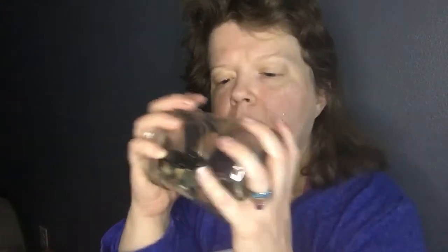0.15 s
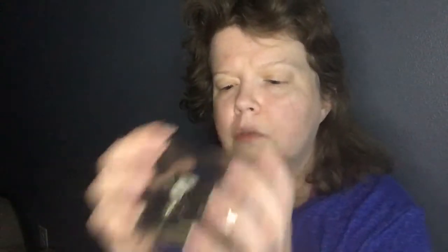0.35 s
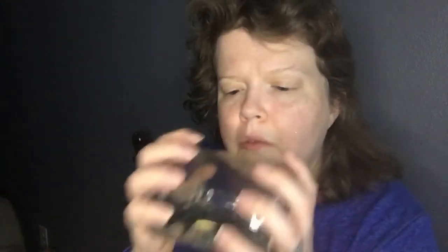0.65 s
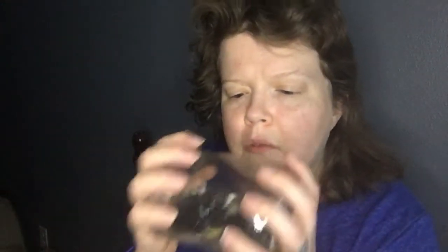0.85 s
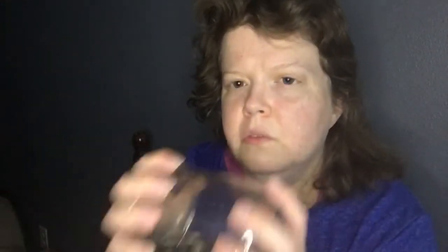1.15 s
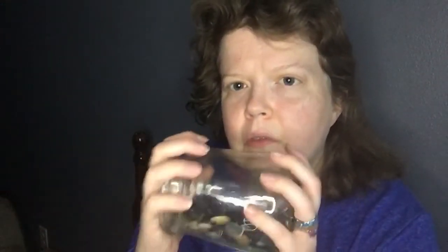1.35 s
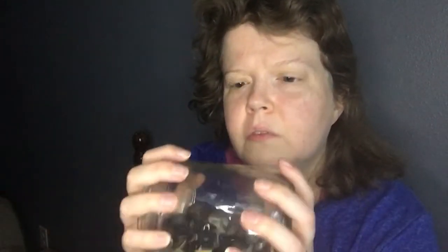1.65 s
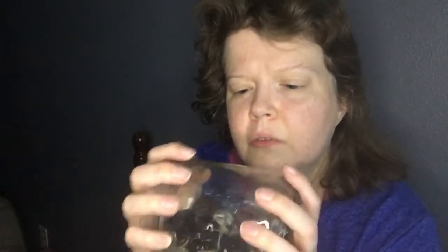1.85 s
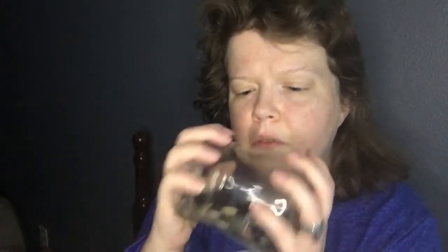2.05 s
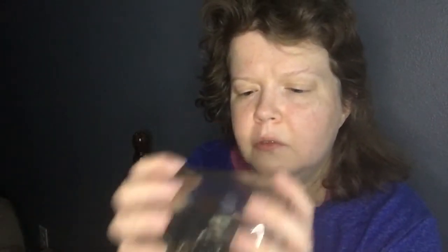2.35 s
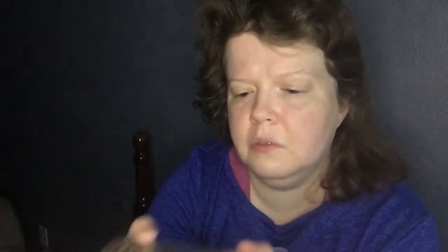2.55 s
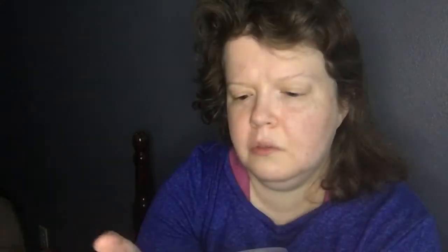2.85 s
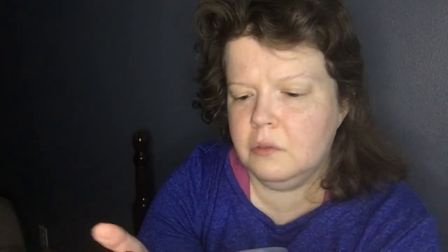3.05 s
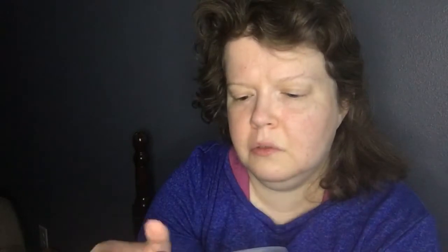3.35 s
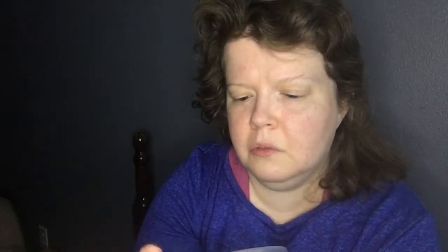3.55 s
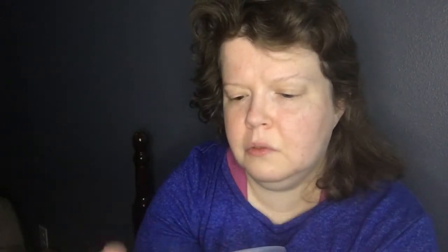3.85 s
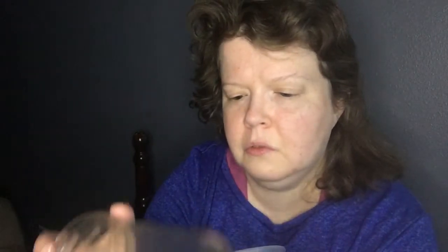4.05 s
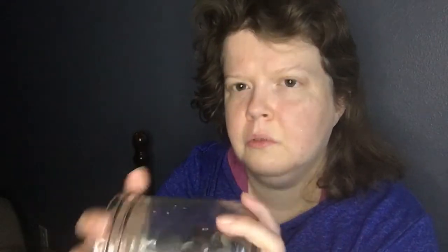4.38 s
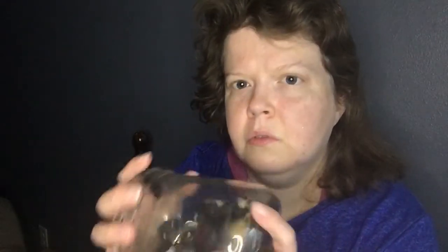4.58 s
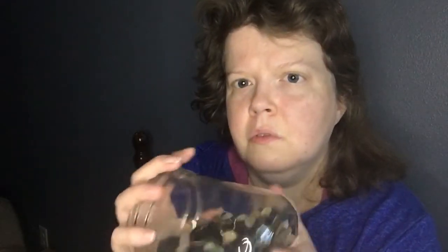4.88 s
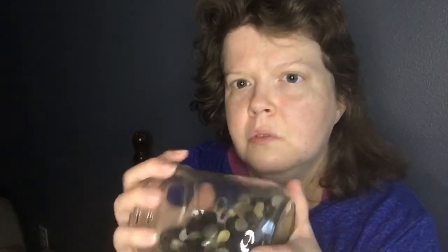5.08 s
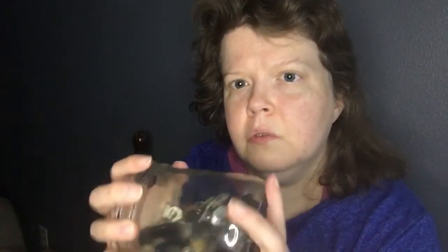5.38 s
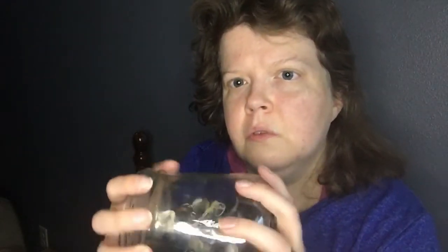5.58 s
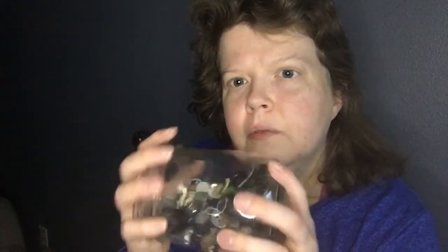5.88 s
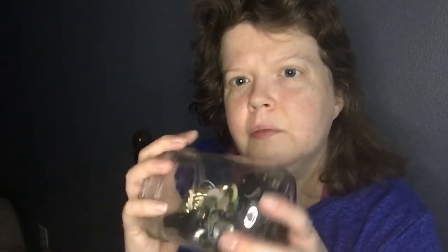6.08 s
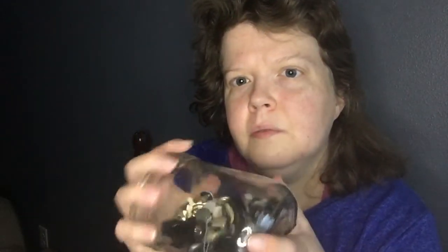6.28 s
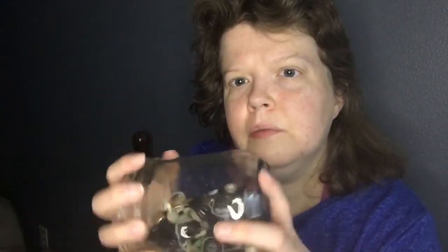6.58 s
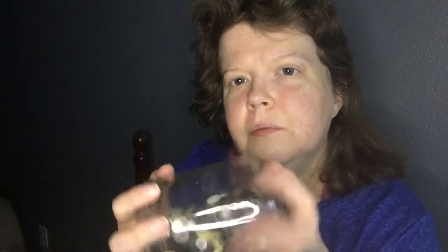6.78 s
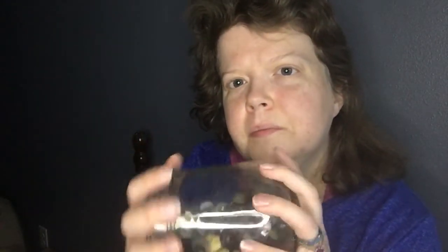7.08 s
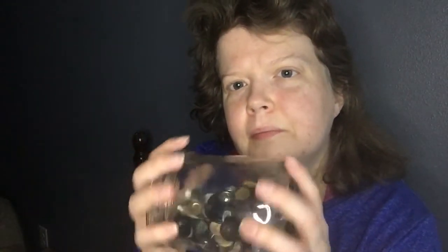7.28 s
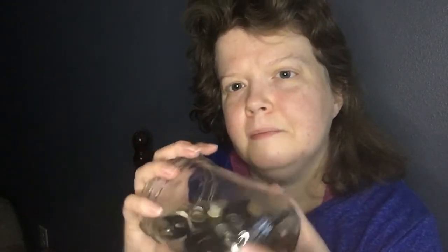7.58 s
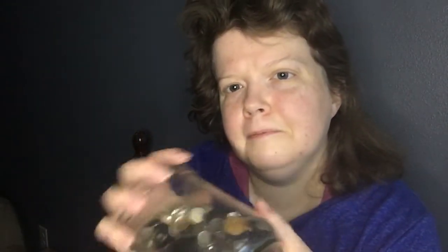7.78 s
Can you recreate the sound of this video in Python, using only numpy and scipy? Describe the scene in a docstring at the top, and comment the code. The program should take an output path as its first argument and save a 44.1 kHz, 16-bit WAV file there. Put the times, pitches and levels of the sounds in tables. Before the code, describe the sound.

Loose buttons rustle and clink in a glass jar that is tilted and shaken close to the microphone. From about 0.3 to 1.4 seconds the heap tumbles in quick surges, with sharp clinks that ring only briefly. Lighter taps follow, then another slide around 2.5 seconds. At about 3.2 seconds comes a bright ping with soft hollow knocks, and a short rattle at 3.6 gives way to a brief lull. A strong tumble arrives between 4.5 and 4.9 seconds, and another with a knock near 5.4. From 6 seconds the buttons patter and clink almost continuously, with a hollow bump near 6.8 and firm clinks around 7.5, still moving at about 8 seconds. The jar gives a faint hollow note as the heap slides. The small room adds a slight echo over a faint low hum and soft hiss.

```python
"""Loose buttons rustle and clink in a glass jar, tilted and shaken close by.
Single buttons strike the hand-damped wall: a crack and a short ring of glass modes.
In between the heap slides and tumbles, a patter of small contacts that keeps the jar's
hollow note humming. Now and then a bump gives a hollow knock.
A small room answers, over a low mains hum and soft hiss."""
import sys
import numpy as np
from scipy import signal
from scipy.fft import rfft, irfft, next_fast_len
from scipy.io import wavfile
from scipy.ndimage import uniform_filter1d

SR = 44100
rng = np.random.default_rng(int(sys.argv[2]) if len(sys.argv) > 2 else 0)


def transcribe(signal):
    """Save signal, clipped to [-1, 1], as a 16-bit WAV file at the path in sys.argv[1]."""
    frames = np.atleast_2d(signal).T
    limited = np.clip(frames, -1, 1)
    pcm = np.round(limited * 32767).astype(np.int16)
    wavfile.write(sys.argv[1], SR, pcm)


N = 349713
RING_SAMPLES = 4096
TIME_S = np.arange(N) / SR
AGE_S = np.arange(RING_SAMPLES) / SR

# still room air: f/Hz, level/dB
AIR_SPECTRUM = [(20, -29), (35, -20), (50, -3), (80, -1), (150, -5.5), (300, -10), (550, -12),
                (1000, -15.5), (2000, -16.5), (6000, -22.5), (10000, -32.5), (16000, -41.5)]
# wavering mains hum: t/s, level/dB
MAINS_LEVEL = [(0.0, -58), (0.22, -56.5), (0.86, -63), (3.49, -60), (3.84, -66.5), (4.24, -58), (4.84, -68),
               (4.95, -58.5), (5.72, -66), (5.92, -54.5), (6.89, -65), (7.22, -57.5), (7.73, -70),
               (7.93, -57)]
# slow part of the room's tail: f/Hz, level/dB
TAIL_SPECTRUM = [(5000, -3.5), (8000, -6.0), (14000, -6)]
# jar's hollow note, set by the grip: t/s, f/Hz, level re heap/dB
HOLLOW_NOTE = [(0, 450, -21.5), (0.4, 453.2, -34), (2.9, 466, -32.5), (3.15, 542, -19.5),
               (4.25, 537.3, -18), (4.5, 491.6, -40), (5.2, 493, -32), (6.3, 464.4, -30),
               (7.93, 489.3, -30)]
# bumps of the jar: t/s, level over 10 ms/dB, ring f/Hz, thud re ring/dB
BUMPS = [(0.313, -39.5, 450, 29), (3.2465, -41.5, 538, -9.5), (3.271, -46, 530, 7),
         (3.298, -47.5, 539.6, 0.5), (3.608, -44.5, 558, 3.5), (4.263, -46, 524, 11.5),
         (5.33, -38, 518, 19), (6.826, -33, 490, 13), (6.832, -35.5, 489, 13)]
# thud of a bump: f/Hz, level/dB
THUD_SPECTRUM = [(80, -28), (250, -23.5), (500, 0.5), (750, -4.5), (1300, 3), (2500, -0.5), (6000, -6.5)]
# crack of a contact: f/Hz, level/dB
CRACK_SPECTRUM = [(100, -33.5), (400, -16), (900, -7.5), (1400, -1), (2200, 2), (3000, 2), (5000, 4.5),
                  (7500, 2.5), (8700, -2.5), (14000, -9.5), (15600, -2), (16500, -23)]
# glass wall modes: f/Hz, t60/s, relative energy/dB
GLASS_MODES = [(1832.4, 0.023, -2), (2290, 0.0023, -12.5), (2990, 0.019, -18.5), (4623.3, 0.021, 0),
               (5036, 0.039, -25.5), (5980, 0.0083, -18.5), (6887, .012, -12.5), (7237, 0.018, -4),
               (7506.6, 0.02092, -5.5), (7887, 0.027, -12.5), (10090, 0.022, -10.5), (10770, 0.032, -18.5),
               (13200, 0.014, -17.5), (12320, .018, -17.5), (13550, 0.0056, -10), (15000, 0.03, -19),
               (15400, 0.026, -21.5)]
# jar's second mode set: f/Hz, t60/s, relative energy/dB
SECOND_MODES = [(1777, .015, -22.5), (3075, 0.024, -13.5), (5240, 0.025, -8), (5347, .032, 5.5),
                (5900, 0.032, -17.5), (7900, 0.017, -18.5), (9550, 0.022, -3), (11880, 0.023, -15)]
# one slide per tip of the jar: landing t/s, level/dB, 60 dB rise/s, 60 dB fall/s, brightness/dB
HEAP_SLIDES = [(0.014, -63, .5, .25, -9), (0.219, -47, .35, 1.1, -5), (0.321, -38.5, .12, .3, 11),
               (0.435, -25, .16, .25, 2.5), (0.638, -36, .2, .34, -10), (0.736, -28, .21, .26, 0.5),
               (0.998, -24, .12, .2, 2), (1.118, -43.5, .7, .7, -21), (1.221, -45.5, .3, .7, -7),
               (1.386, -41, .5, .35, -5), (2.114, -50, .35, .18, -17), (2.391, -51, .28, .55, -11),
               (2.515, -35.5, .3, .4, -8), (2.882, -65, .3, .35, 3), (3.276, -38.5, .4, .25, 1),
               (3.399, -52.5, .3, .3, -2), (3.604, -38, .38, .47, -1.5), (4.225, -57.5, .4, 1.5, -2),
               (4.499, -39, .4, .37, -2), (4.642, -29, .25, .5, 3.5), (4.818, -36, .67, .4, -1),
               (5.165, -55, .4, 1.3, -3), (5.336, -42, .53, .5, -2), (5.431, -39, .45, .2, 1),
               (5.695, -49, .2, .7, -8), (5.965, -49.5, 1.05, .9, -8), (6.157, -46, .3, 1.1, 0),
               (6.447, -50.5, .6, .9, -7), (6.562, -44, .28, .22, 2), (6.661, -42, .16, .42, -2),
               (6.841, -39, .13, .28, 5), (6.938, -33.5, .08, .29, 8), (7.17, -50, .7, .76, -5),
               (7.373, -40.5, .17, .3, 3), (7.504, -37.5, .24, .3, -3), (7.858, -49, .3, 1.0, -4),
               (7.919, -36, .18, .42, 1)]
# light taps of the heap: f/Hz, level/dB
TAP_SPECTRUM = [(900, -3), (1300, -2), (1600, 3), (1850, 2.5), (2400, -1), (3100, 2.5), (4600, .5),
                (6200, -1), (7300, 1), (10000, .5), (14000, 0)]
# strikes on the second mode set: t/s, level over 10 ms/dB, treble/dB
PING_HITS = [(0.3445, -40, -6), (1.6463, -61.5, 8), (1.695, -62, 14.5), (3.2462, -19.3, -5),
             (3.3848, -44.5, 0), (3.675, -45, 4), (4.239, -47, -6), (4.2804, -50, -9), (5.274, -40.5, -4.5),
             (6.1565, -34, -16), (6.1867, -37, -18.5), (6.202, -38.5, -2.5), (6.229, -47, -3),
             (6.3751, -48, -6), (6.8289, -28.5, 10)]
# clink colour as the jar turns: t/s, gain below 1 kHz/dB, gain at 6.8-8 kHz/dB
TURN_COLOUR = [(0, 2, 1.5), (2.1, 1, -2), (2.8, 0, 6), (4.6, -1, 7), (5.4, -1, 4), (7.4, -7, 8)]
# clear wall strikes: t/s, level over 10 ms/dB, lowest mode gain/dB, hardness (more = brighter)
CLINK_HITS = [(0.0538, -50, 6.5, -37), (0.149, -55, 1, 4), (0.314, -25.5, -3, 1), (0.398, -27.5, 4, -19),
              (0.4176, -27.5, -3, -1), (0.424, -24.5, 5, 0), (0.4364, -26.5, -6, -3), (0.4555, -27, -10, 2),
              (0.4934, -40, -13, 14), (0.5924, -39, 12, -35.5), (0.6074, -33.5, 12, 0.5),
              (0.621, -26, 1.5, -12), (0.6454, -29.5, 6.5, 7), (0.6775, -31.5, 7, 6.5), (0.7095, -29, 0, 3),
              (0.7228, -16, -5, -9), (0.7289, -26, 1, 4), (0.737, -34, -8, 3), (0.7601, -29.5, -16, -32),
              (0.7845, -26.5, -1, 1.5), (0.935, -34.5, -3, 1.5), (0.961, -34.5, -1, -7),
              (0.9846, -17, 1.5, -6.5), (0.9999, -25.5, -10, 2), (1.0064, -29.5, 7, -3),
              (1.112, -31, 5, -24), (1.196, -41, 5, -3), (1.2774, -14.5, -5, -4.5), (1.307, -34, -13, 12.5),
              (1.358, -25, -3, -25), (1.3832, -33.5, -4, -25), (1.4863, -46.5, 5, 17), (1.9142, -34, 3, 3),
              (2.0096, -42.5, -2.5, -28.5), (2.03, -51, 7, -2), (2.078, -42.5, -5.5, -20),
              (2.109, -39, -0.5, -16.5), (2.144, -51, -3, -7), (2.2606, -56, -13, 0),
              (2.2834, -58.5, 4, 10), (2.332, -50.5, -2, -2), (2.3683, -44, 4, -1), (2.389, -48, -3, -9),
              (2.411, -47, -6, -8), (2.4593, -35.5, 1, 8), (2.481, -24, 5.5, -3), (2.5017, -31, -2, -10),
              (2.5123, -28, -24, -9), (2.5718, -34, -2, -7.5), (2.5922, -40, -1, -2), (2.7388, -56, -2, 8),
              (2.8012, -49.5, -1, 1), (2.8152, -46.5, 0, 0), (2.8355, -58, 1, -2), (2.886, -43.5, -6, 9),
              (2.9068, -56, -3, 5), (2.9758, -54.5, -3.5, 5), (3.1194, -55.5, 3.5, -3.5),
              (3.2394, -37.5, -9, -18), (3.545, -40.5, 4.5, -4), (3.5833, -27, -7.5, -1),
              (3.608, -27.5, -12.5, -6.5), (3.9092, -57, -3, -10), (4.1937, -49, -11.5, -3),
              (4.3603, -46, -2, -1.5), (4.4764, -38.5, 3, 0), (4.4993, -37, -2, -4), (4.5152, -35, 2.5, 11),
              (4.5897, -25, 8, 14.5), (4.6443, -21.3, 13, 6), (4.6765, -18.2, 13, -2),
              (4.7149, -30, 7, -17), (4.756, -35.5, 2, 3), (4.7742, -34, 10.5, 6.5),
              (4.7876, -35.5, 14, 10), (5.0943, -54, 7, 7), (5.3305, -25.5, -6.5, -8),
              (5.3491, -33, -11, 1), (5.414, -34, 0.5, -1), (5.5316, -49, -2, -1),
              (5.4416, -23.5, -9.5, -1), (5.5674, -35.5, -2.5, -8.5), (5.5937, -41.5, -6, -6),
              (5.8125, -39, -3, 5), (5.8293, -47, 8, 5), (5.8497, -44, -5, -3), (5.887, -40, 8, 11.5),
              (6.0699, -30, -1.5, 0), (6.1196, -40, 2, -1), (6.1404, -45, -6, -16),
              (6.423, -47, -19.5, -9.5), (6.4531, -30.5, -2.5, 4), (6.538, -31.5, -6, 0),
              (6.5574, -38.5, -4, 0), (6.6269, -33, -5, 3), (6.6562, -37.5, 5, 4), (6.6888, -41, 5, -11),
              (6.754, -37, 5, -2.5), (6.853, -35.5, -4, -3), (6.8748, -34.5, -2.5, 0),
              (6.8826, -31, 2.5, 8), (6.919, -28, -11, 11.5), (6.935, -34.5, -3, 7),
              (6.9865, -39.5, -5, -3.5), (7.0512, -48, 3, 8), (7.1123, -41, -6, -4), (7.1294, -43.5, -1, 0),
              (7.1683, -43.5, -21, 8), (7.181, -40, -17, -13), (7.3235, -36.5, -4, 0),
              (7.354, -33, -6.5, -2), (7.3736, -38, -5, -1), (7.3885, -20.3, -3, -15),
              (7.4627, -24.3, 2.5, -11.5), (7.5116, -18.2, 3, -6), (7.5304, -34, -15, -21),
              (7.5477, -29, 2, -13), (7.7265, -52.5, -3, 0), (7.902, -40, -12, -6), (7.912, -38.5, -10, -4)]


def undb(db):
    """Decibels to gain."""
    return 10 ** (np.asarray(db) / 20)


def unit(x):
    """Scale to energy 1."""
    return x / np.sqrt(np.sum(x ** 2))


def fade(t_s, t60_s):
    """Exponential decay."""
    return np.exp(-np.log(1000) * t_s / t60_s)


def curves(table, at_s=TIME_S):
    """Columns of a time table, interpolated."""
    t_s, *columns = np.transpose(table)
    return [np.interp(at_s, t_s, column) for column in columns]


def colour(x, spectrum):
    """Minimum-phase filter through points f/Hz, level/dB."""
    n = next_fast_len(len(x), real=True)
    f_hz, db = np.transpose(spectrum)
    bins_hz = np.maximum(np.arange(n // 2 + 1) * SR / n, 1)
    gain = undb(np.interp(np.log(bins_hz), np.log(f_hz), db))
    cepstrum = irfft(np.log(gain), n)
    cepstrum[1:n // 2] *= 2
    cepstrum[n // 2 + 1:] = 0
    return irfft(rfft(x, n) * np.exp(rfft(cepstrum)), n)[:len(x)]


def drift(rate_hz):
    """Smooth random drift, spread near 1."""
    hold = int(SR / rate_hz)
    steps = np.repeat(rng.standard_normal(N // hold + 1), hold)
    return uniform_filter1d(steps, hold)[:N]


def place(track, t_s, sound, level_db):
    """Add a sound with the energy of 10 ms at level_db."""
    i = int(t_s * SR)
    track[i:i + RING_SAMPLES] += (unit(sound) * undb(level_db) * np.sqrt(SR / 100))[:N - i]


def room_air():
    """Soft hiss of the room."""
    hiss = np.sqrt(N) * unit(colour(rng.standard_normal(N), AIR_SPECTRUM))
    return hiss * undb(-68.5 + 0.8 * drift(1.5))


def hum(f_hz, level_db, waver_hz):
    """Low tone, wavering in pitch and level."""
    phase = 2 * np.pi * np.cumsum(f_hz + waver_hz * drift(9)) / SR
    return np.sqrt(2) * undb(level_db + 0.4 * drift(2.7)) * np.sin(phase)


def hums():
    """Mains hum and two fainter tones; one fades out."""
    mains_db, = curves(MAINS_LEVEL)
    fading_db = -65 - 20 * np.maximum(TIME_S - 2.374, 0)
    return hum(58.4, mains_db, 2.2) + hum(105.3, fading_db, 1.3) + hum(118.3, -73.5, 1.8)


def room(x, early_db, early_t60_s, late_db, late_t60_s):
    """Quick reflections off table and body, then a tail that dulls as it fades."""
    t_s = np.arange(SR * 3 // 4) / SR
    onset = np.clip((t_s - 0.003) / 0.0013, 0, 1)
    early, bright, dark = rng.standard_normal((3, len(t_s))) * onset
    tail = colour(dark * fade(t_s, late_t60_s), TAIL_SPECTRUM)
    tail += 0.78 * bright * fade(t_s, 0.4 * late_t60_s)
    response = undb(early_db) * unit(early * fade(t_s, early_t60_s)) + undb(late_db) * unit(tail)
    return signal.oaconvolve(x, response)[:N]


def hollow_note(heap_db):
    """The moving heap drives the jar's hollow resonance."""
    f_hz, share_db = curves(HOLLOW_NOTE)
    drive = rng.standard_normal(N) * undb(heap_db + share_db)
    amplitude = signal.oaconvolve(drive, unit(fade(AGE_S, t60_s=0.17)))[:N]
    return np.sqrt(2) * amplitude * np.sin(2 * np.pi * np.cumsum(f_hz) / SR)


def knocks():
    """Bumps on the jar: short thud, hollow ring."""
    out = np.zeros(N)
    attack = 1 - np.exp(-AGE_S / 0.001)
    for t_s, level_db, f_hz, thud_db in BUMPS:
        ring = np.sin(2 * np.pi * f_hz * AGE_S) * fade(AGE_S, t60_s=0.088) * attack
        thud = colour(rng.standard_normal(RING_SAMPLES) * fade(AGE_S, t60_s=0.039), THUD_SPECTRUM)
        place(out, t_s, unit(ring) + undb(thud_db) * unit(thud), level_db)
    return out


def strike(modes, crack_db, crack_t60_s, scatter_db, detune, button_db):
    """One contact: crack, the button's own tick, glass modes varying with spot and grip."""
    f_hz, t60_s, mode_db = np.transpose(modes)[:, :, None]
    spot, shift, grip = rng.standard_normal((3, len(modes), 1))
    f_hz = f_hz * (1 + detune * shift)
    t60_s = t60_s * np.exp(0.19 * grip)
    rings = np.sin(2 * np.pi * f_hz * AGE_S) * fade(AGE_S, t60_s) / np.sqrt(t60_s)
    polarity = (-1) ** np.arange(len(modes))[:, None]  # neighbouring modes in antiphase
    attack = 1 - np.exp(-AGE_S / 0.0001)  # bending wave runs round the jar
    glass = attack * np.sum(polarity * undb(mode_db + scatter_db * spot) * rings, axis=0)
    crack = colour(rng.standard_normal(RING_SAMPLES) * fade(AGE_S, crack_t60_s), CRACK_SPECTRUM)
    button_hz = rng.uniform(4500, 13000)
    button = attack * np.sin(2 * np.pi * button_hz * AGE_S) * fade(AGE_S, t60_s=0.0038)
    return unit(unit(glass) + undb(crack_db) * unit(crack) + undb(button_db) * unit(button))


def heap_motion(rest_db, rest_bright_db):
    """Slides build, land and settle over a faint stir: level/dB, power-weighted brightness/dB."""
    power = np.full(N, undb(rest_db) ** 2)
    bright_sum = power * rest_bright_db
    for t_s, level_db, rise_s, fall_s, bright_db in HEAP_SLIDES:
        drop_db = 60 * np.maximum((t_s - TIME_S) / rise_s, (TIME_S - t_s) / fall_s).clip(0, 2)
        slide_power = undb(level_db - drop_db) ** 2
        power += slide_power
        bright_sum += slide_power * bright_db
    return 10 * np.log10(power), bright_sum / power


def patter(rate_hz, voices, spread_db):
    """Random small contacts, many faint, few firm; mean power near 1."""
    chance, force, pick = rng.random((3, N))
    gain = undb(spread_db * np.minimum(-np.log(1 - force), 3))
    gain /= np.sqrt(np.mean(gain ** 2))
    out = np.zeros(N + RING_SAMPLES)
    for i in np.flatnonzero(chance < rate_hz / SR):
        out[i:i + RING_SAMPLES] += gain[i] * voices[int(pick[i] * len(voices))]
    return out[:N] * np.sqrt(SR / rate_hz)


def tilt_treble(x, bright_db):
    """Tilt the treble, the top band most; level roughly held."""
    dull, below_top = (signal.sosfiltfilt(signal.butter(2, f_hz, fs=SR, output="sos"), x)
                       for f_hz in (6200, 11000))
    gain = undb(bright_db)
    tilted = dull + gain * (below_top - dull) + undb(1.2 * bright_db - 2.5) * (x - below_top)
    return tilted / np.sqrt((1 + gain ** 2) / 2)


def tumble(heap_db, bright_db):
    """Sliding buttons tap the glass and tick on each other, more often as the heap speeds up."""
    rate_hz = 600 * undb(0.3 * (heap_db + 46))
    tap_voices = [strike(GLASS_MODES, crack_db=-4, crack_t60_s=0.012, scatter_db=8.5,
                         detune=0.01, button_db=-17) for _ in range(40)]
    taps = patter(rate_hz, tap_voices, spread_db=5.7)
    tick_voices = [strike(SECOND_MODES, crack_db=3, crack_t60_s=0.007, scatter_db=4,
                          detune=0.008, button_db=0) for _ in range(24)]
    ticks = patter(0.4 * rate_hz, tick_voices, spread_db=4.8)
    heap = undb(-1.56) * colour(taps, TAP_SPECTRUM) + undb(-10.5) * ticks
    return tilt_treble(heap, bright_db) * undb(heap_db)


def pings():
    """Strikes that wake the jar's second mode set."""
    out = np.zeros(N)
    for t_s, level_db, treble_db in PING_HITS:
        hit = strike(SECOND_MODES, crack_db=-9, crack_t60_s=0.015, scatter_db=2.5,
                     detune=0.0056, button_db=-17.5)
        place(out, t_s, colour(hit, [(6000, 0), (9500, treble_db)]), level_db)
    return out


def clinks():
    """Single buttons hit the wall; the spot weights the low modes, hardness adds treble."""
    out = np.zeros(N)
    for t_s, level_db, low_db, hardness in CLINK_HITS:
        dull_db, upper_db = curves(TURN_COLOUR, t_s)
        upper_db += 0.35 * hardness + 0.3 * low_db
        crack_db = -8.5 - 0.23 * (level_db + 31.5)  # glancing blows: more crack, less ring
        hit = strike(GLASS_MODES, crack_db, crack_t60_s=0.015, scatter_db=0.5,
                     detune=0.012, button_db=-17.5)
        lows = [(1000, dull_db + min(low_db, 0)), (1600, low_db), (2100, low_db), (3400, 0)]
        mids = [(5500, 0), (6800, upper_db), (8000, upper_db)]
        highs = [(9800, 0.7 * hardness), (13000, 1.2 * hardness)]
        place(out, t_s, colour(hit, lows + mids + highs), level_db)
    return out


def scene():
    """Jar, room and background; mono."""
    heap_db, bright_db = heap_motion(rest_db=-81, rest_bright_db=-10)
    jar = clinks() + pings() + knocks() + tumble(heap_db, bright_db) + hollow_note(heap_db)
    reverb = room(jar, early_db=-24, early_t60_s=0.047, late_db=-12, late_t60_s=0.36)
    return (jar + reverb + room_air() + hums())[None]


def record(dry):
    """Steep low-pass at 16 kHz."""
    return signal.sosfilt(signal.ellip(8, 0.2, 70, 16000, fs=SR, output="sos"), dry)


dry = scene()
out = record(dry)
transcribe(out)
```